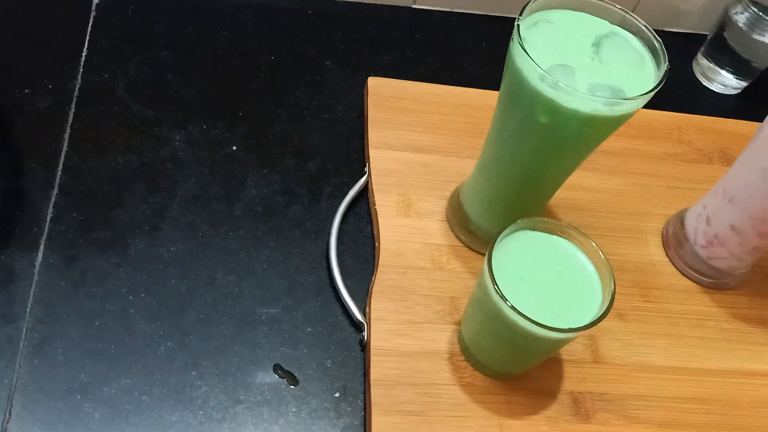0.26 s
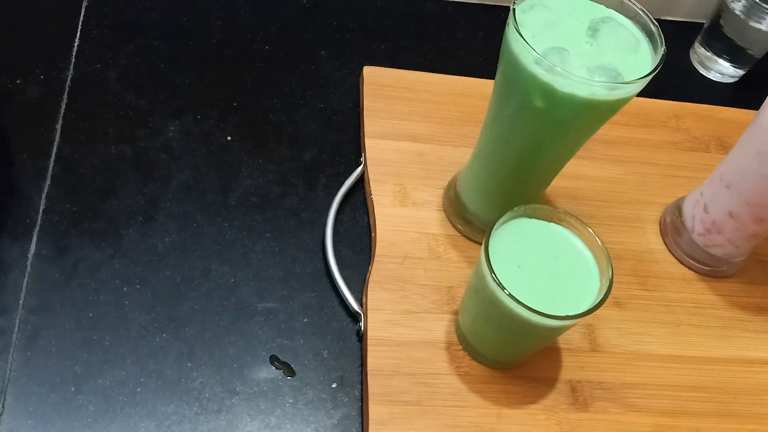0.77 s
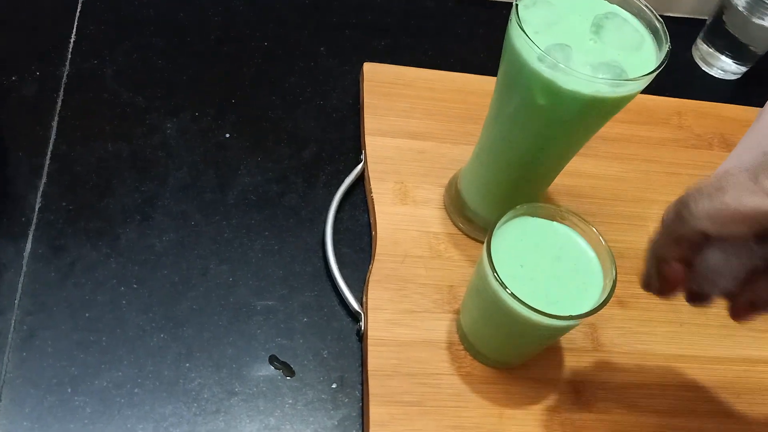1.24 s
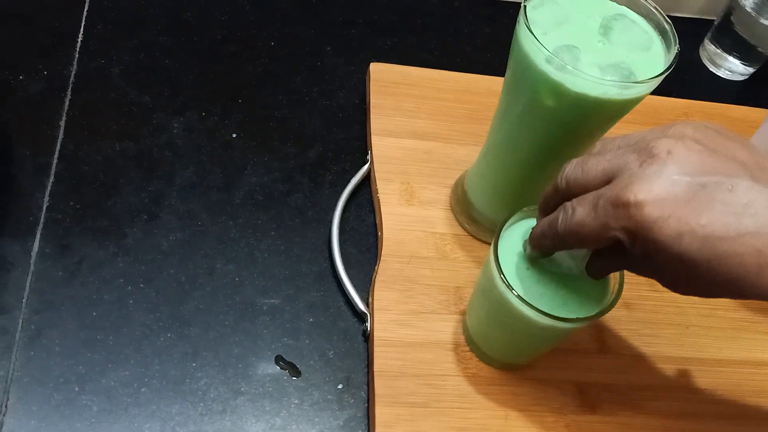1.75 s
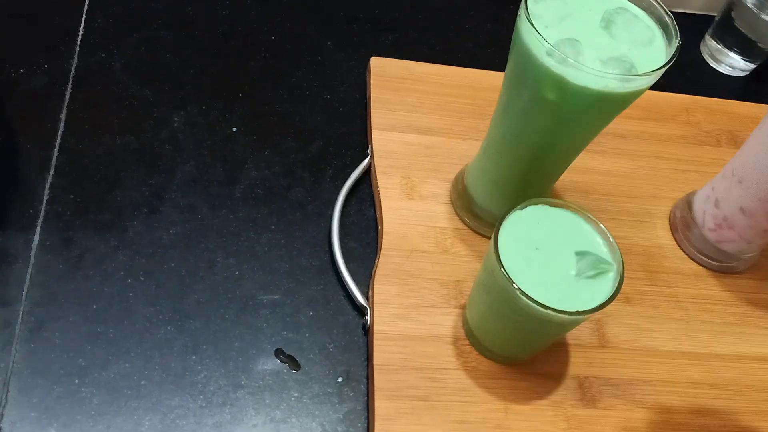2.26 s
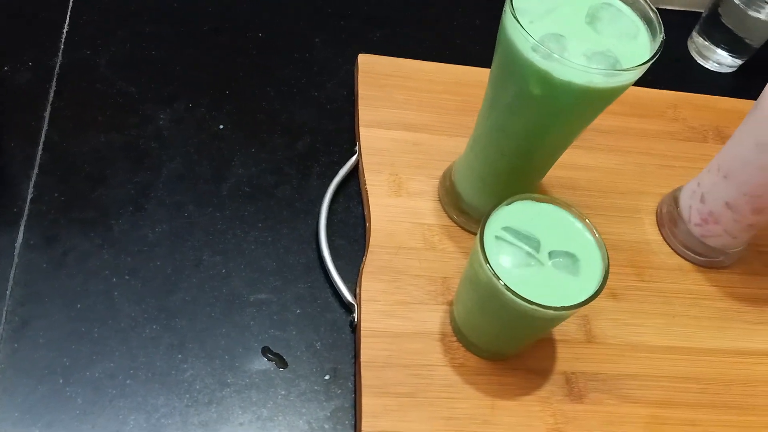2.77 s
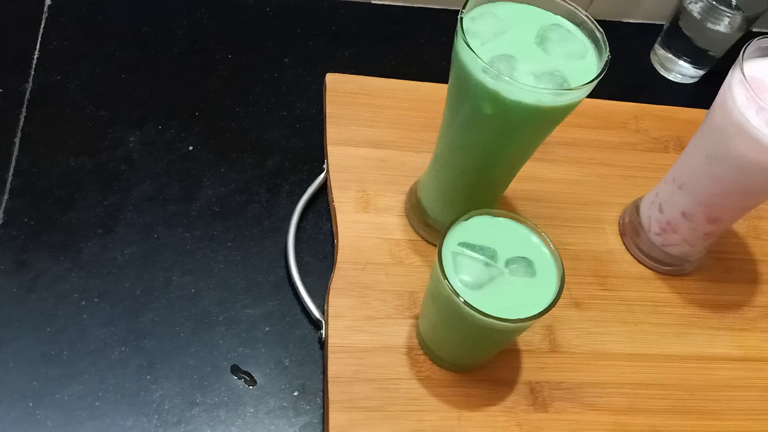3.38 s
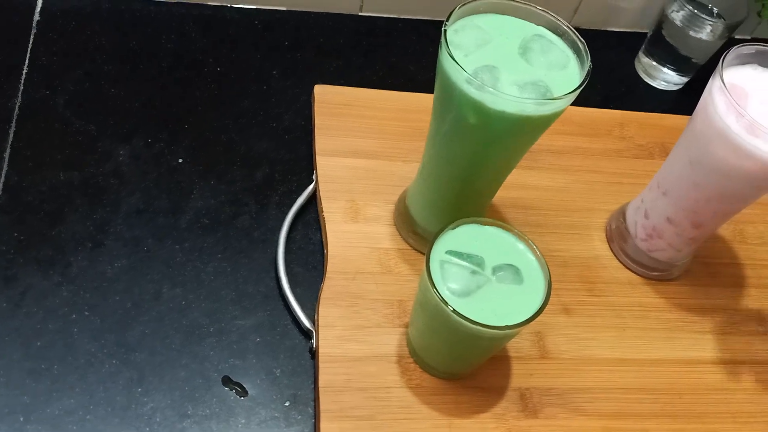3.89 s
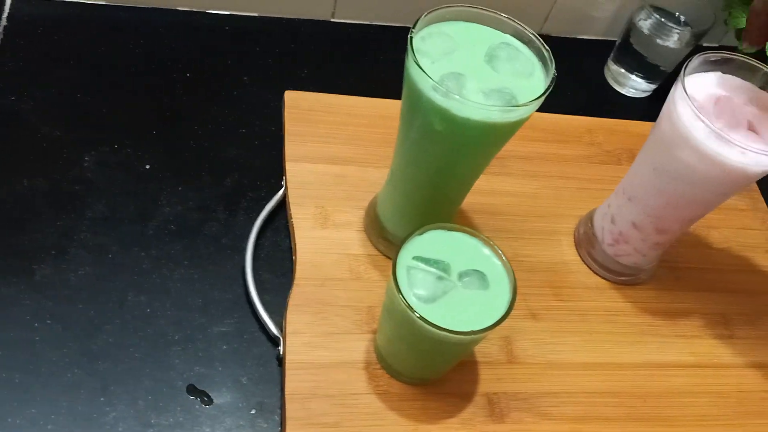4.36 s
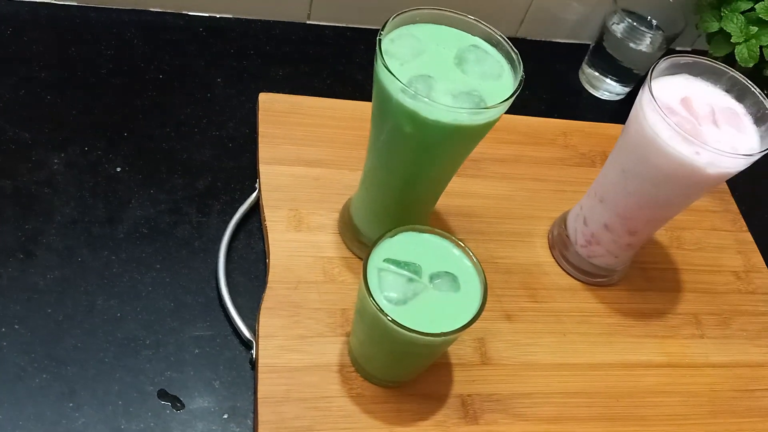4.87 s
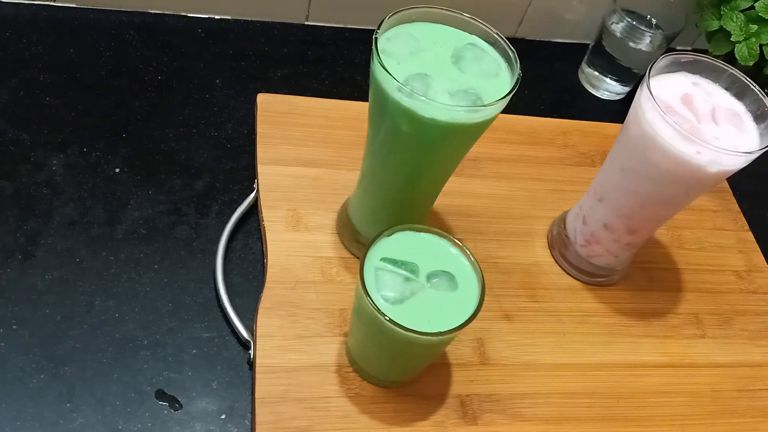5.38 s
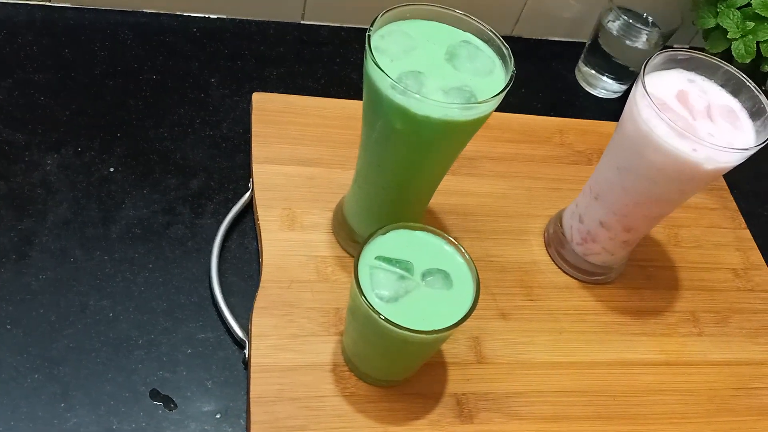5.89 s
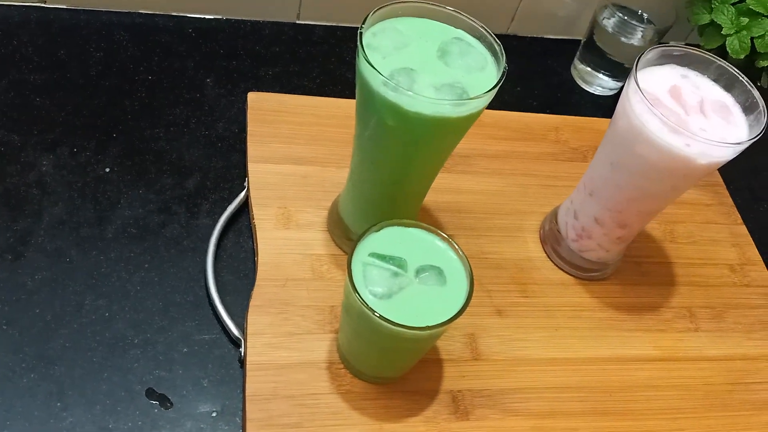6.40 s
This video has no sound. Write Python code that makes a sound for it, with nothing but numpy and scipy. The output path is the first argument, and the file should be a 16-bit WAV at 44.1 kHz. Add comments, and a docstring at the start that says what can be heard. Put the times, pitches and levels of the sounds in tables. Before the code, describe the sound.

Close stereo pickup in a small, reflective kitchen with soft room noise and a faint hum. Ice rattles quickly in a bowl, thins out and ends in a sharp knock. A drinking glass gives a clear, high clink, followed by muted bumps and a few more ice knocks. Tiny bright crackles come later, a thin whine creeps in, and a glass dish clatters hard onto the stone counter.

```python
"""Ice for two milk drinks

Ice is picked out of a bowl and put into two glasses of milk drink on a kitchen board.
Cubes rattle, mostly in the bowl, ring a rim, knock afloat or crackle; near the end a glass dish is set down hard.
Objects are sums of fading tones, and contacts add short bursts of shaped noise.
A tiled kitchen echoes it all with fading noise, over room noise, a fan's hum and a faint, thin whine."""
import sys
import numpy as np
from scipy import signal
from scipy.fft import rfft, irfft
from scipy.io import wavfile
from scipy.ndimage import uniform_filter1d

SR = 44100
rng = np.random.default_rng(int(sys.argv[2]) if len(sys.argv) > 2 else 0)


def wrap_up_sound(samples):
    """Save the sound to the file named by the first command line argument, as 16-bit audio."""
    columns = np.atleast_2d(samples).T
    # keep every value between -1 and 1, then stretch to whole-number steps
    tamed = np.clip(columns, -1, 1)
    steps = np.round(tamed * 32767).astype(np.int16)
    wavfile.write(sys.argv[1], SR, steps)


N = 293176
T = np.arange(N) / SR
RING = 24576  # longest ring of one contact [samples]
RING_T = T[:RING]

# the crack of ice on a hard wall: (frequency [Hz], level [dB])
ICE_CRACK = [(100, -19.5), (800, -15.5), (1400, 0), (2400, 1), (3400, -8), (5800, -8.5), (6800, -23.5),
             (8200, -39.5), (12000, -42), (14500, -44.5)]
# a drinking glass before damping or a rise of the drink: (frequency [Hz], level [dB], time to fade by 60 dB [s])
GLASS_MODES = [(714, -30.5, 0.1), (2125, -23.5, 0.42), (2253, -9.5, 0.82), (2273, 2, 0.56),
               (2360, -11, 0.18), (5633, -25, 0.47), (5683, -22, 0.082), (8549, -53, .3),
               (10220, -58, 0.22), (10900, -46, .2)]
# the dull knock of the dish on the counter, also used for floating cubes: (frequency [Hz], level [dB])
DULL_KNOCK = [(60, -57), (200, -18.5), (400, -21.5), (550, -25.5), (700, -18), (1100, -9.5), (1600, 0.5),
              (2500, -4.5), (3200, -19.5), (3700, -26.5), (5300, -24), (6600, -15.5), (7900, -57),
              (15000, -56)]


def amp(db):
    """Turn decibels into a gain."""
    return 10 ** (np.asarray(db) / 20)


def unit(x):
    """Scale to an energy of one."""
    return x / np.sqrt(np.sum(x ** 2))


def level(x, db):
    """Scale to an average (rms) level."""
    return x * amp(db) / np.std(x)


def along(hz, points):
    """Read between (Hz, value) points on a log-frequency axis."""
    f, v = np.transpose(points)
    return np.interp(np.log(np.maximum(hz, 1)), np.log(f), v)


def colour(x, points):
    """Filter through (Hz, dB) points; the cepstrum gives a filter that never answers before its input."""
    size = 4096
    gains = amp(along(np.fft.rfftfreq(size, 1 / SR), points))
    cepstrum = irfft(np.log(gains))
    # fold the second half onto the first, so that nothing comes early
    cepstrum[1:size // 2] *= 2
    cepstrum[size // 2 + 1:] = 0
    response = irfft(np.exp(rfft(cepstrum)))
    return signal.fftconvolve(x, response)[:len(x)]


def walk(rate):
    """Wander smoothly at random, with a spread of one and about this many new steps per second."""
    k = int(SR / rate)
    steps = np.repeat(rng.standard_normal(N // k + 1), k)
    smooth = uniform_filter1d(uniform_filter1d(steps, k), k)
    return level(smooth[:N], 0)


def narrow(hz, width_hz):
    """Make a tone whose size and phase wander, which spreads it over a narrow band."""
    phase = 2 * np.pi * np.cumsum(hz * np.ones(N)) / SR
    tone = walk(2 * width_hz) * np.sin(phase) + walk(2 * width_hz) * np.cos(phase)
    return level(tone, 0)


def fade(t60):
    """Die away exponentially, by 60 dB in t60 seconds."""
    return np.exp(-np.log(1000) * RING_T / t60)


def gate(start, end, attack_s, release_s):
    """Rise from start, hold until end, then fall."""
    rise = np.clip((T - start) / attack_s, 0, 1)
    return rise * np.clip(1 - (T - end) / release_s, 0, 1)


def ring(modes, damping=1):
    """An object's answer to one tap: fading sines of alternating sign, shortened by damping."""
    total = np.zeros(RING)
    for k, (hz, db, t60) in enumerate(modes):
        sine = fade(t60 / damping) * np.sin(2 * np.pi * hz * RING_T)
        total += (-1) ** k * amp(db) * unit(sine)
    return unit(total)


def struck(modes):
    """Vary the modes for one contact: each a little stronger or weaker, by where it lands."""
    scatter_db = 2
    luck = rng.standard_normal(len(modes))
    return [(hz, db + scatter_db * chance, t60) for (hz, db, t60), chance in zip(modes, luck)]


def crack(points, t60):
    """The brief noisy crunch of a contact: fading noise, coloured."""
    return unit(colour(rng.standard_normal(RING) * fade(t60), points))


def contact(body, treble_db, low_db=0):
    """A harder contact brings out the treble, a heavier one the low modes."""
    return colour(body, [(800, 0), (1400, low_db), (1700, low_db), (2250, 0), (2900, 0), (4200, treble_db)])


def strike(hits, bodies, pan_db):
    """Play one body per hit, at its time and level, all from one place; pan_db is left minus right."""
    out = np.zeros(N + RING)
    for (s, db, *_), body in zip(hits, bodies):
        out[int(s * SR):][:RING] += amp(db) * body / np.abs(body).max()
    return amp([[pan_db / 2], [-pan_db / 2]]) * out[:N]


def room_air():
    """Room noise: a shared part and a left-right difference that is weak in the bass, both wavering."""
    # (frequency [Hz], level [dB])
    air_colour = [(25, -42.5), (60, -20), (125, -5), (170, -10.5), (300, -14), (500, -16.5), (900, -23.5),
                  (1400, -29), (2200, -21.5), (3300, -35), (4500, -37.5), (6000, -34.5), (7800, -54.5),
                  (15000, -60.5)]
    air_db, waver_db, wavers_per_s = -66.5, 1, 4
    mid = colour(rng.standard_normal(N), air_colour)
    side = colour(rng.standard_normal(N), air_colour)
    side = colour(side, [(120, -18.0), (300, -10.5), (600, -6.5), (1200, 0.0)])
    pair = np.array([mid + side, mid - side])
    return amp(air_db) / np.std(mid) * pair * amp(waver_db * walk(wavers_per_s))


def fan():
    """The fan's hum: low tones whose size and phase waver."""
    # (frequency [Hz], width [Hz], level [dB])
    hums = [(118, 32, -85), (126, 33, -76.5)]
    return sum(amp(db) * narrow(hz, width) for hz, width, db in hums)


def whine():
    """A thin whine, as of a water pipe: a drifting tone that wavers separately left and right."""
    # how it comes and goes: (time [s], level [dB])
    loudness = [(4.1, -110), (4.38, -79), (4.72, -72), (5.0, -73.5), (5.2, -76), (5.5, -75), (6.52, -75.5),
                (6.65, -90)]
    centre_hz, width_hz, drift_hz = 3368, 56, 5
    pitch = centre_hz + drift_hz * walk(5.3)
    swell = amp(np.interp(T, *np.transpose(loudness)))
    return swell * np.array([narrow(pitch, width_hz) for _ in range(2)])


def kitchen(sound, build_s=0.00021):
    """Spread echoes made of noise, unrelated left and right; the treble dies first."""
    # how long echoes last: (frequency [Hz], time to fade by 60 dB [s])
    echo_times = [(200, 0.96), (1000, 0.6), (2500, 0.54), (5000, 0.55), (12000, 0.34)]
    hz = np.fft.rfftfreq(RING, 1 / SR)
    edges = np.append(0, np.geomspace(300, SR / 2, num=9))
    noise = rfft(rng.standard_normal((2, RING)))
    tails = np.zeros((2, RING))
    for lo, hi in zip(edges, edges[1:]):
        band = irfft(noise * (hz >= lo) * (hz < hi))
        tails += band * fade(along((lo + hi) / 2, echo_times))
    tails = tails * (1 - np.exp(-(RING_T / build_s) ** 2))
    mono = sound.mean(axis=0)
    return np.array([signal.fftconvolve(mono, unit(tail))[:N] for tail in tails])


def board():
    """Soft contacts push slowly, so the wooden board thumps without a click."""
    # dull, soft knocks: (time [s], level [dB], treble [dB])
    thumps = [(2.696, -47.5, 19), (2.83, -58, 8), (5.059, -54.5, -12), (6.561, -54, 17)]
    # the wood: (frequency [Hz], level [dB])
    wood = [(25, -38), (60, -15), (130, 3.5), (220, -10), (380, -1.5), (520, -1), (850, -8.5), (1250, -4),
            (1700, -10), (2300, 4), (3500, -23), (9000, -63)]
    push = 1 - fade(0.13)
    knocks = [contact(push * crack(wood, t60=0.13), treble_db) for *_, treble_db in thumps]
    return strike(thumps, knocks, pan_db=-0.5)


def floating():
    """Cubes afloat nudge the wall of the glass; the drink chokes the ring."""
    # (time [s], level [dB])
    bumps = [(2.771, -49), (2.815, -45.5), (2.829, -52)]
    wall = ring(GLASS_MODES, damping=29)
    knocks = [wall + amp(-13) * crack(DULL_KNOCK, t60=0.01) for _ in bumps]
    return strike(bumps, knocks, pan_db=9)


def bright_snaps():
    """Quick bright snaps at the glass: the click of a second rim tap, then ice crackling as it gets wet."""
    # the click, then the crackles: (time [s], level [dB])
    snap_times = [(2.0812, -53), (4.4053, -44), (4.414, -41.5), (4.4225, -51), (4.4292, -43.5),
                  (4.432, -44.5), (4.4375, -41.5), (4.4395, -39), (4.781, -49.5)]
    # one snap: (frequency [Hz], level [dB])
    snap_colour = [(200, -18), (900, -10), (1700, -1.5), (2300, 4.5), (3200, -9.5), (4200, -5.5), (5200, 0),
                   (6800, -8.5), (8000, -22.5), (12000, -28), (14500, -27)]
    wall = amp(-3.0) * ring(GLASS_MODES, damping=2.7)
    return strike(snap_times, [wall + crack(snap_colour, t60=0.015) for _ in snap_times], pan_db=4.5)


def dish(ring_db=-23.0, ring_pan_db=5):
    """The heavy dish clatters on the stone counter; its clear ring builds up as it rocks flat."""
    # landing and rocking flat: (time [s], level [dB])
    landing = [(5.5773, -21), (5.5821, -33), (5.587, -29.5), (5.597, -29.5), (5.6015, -32), (5.656, -36.5)]
    # the dish before damping: (frequency [Hz], level [dB], time to fade by 60 dB [s])
    dish_modes = [(430, -21.5, 1), (696, -16, 0.17), (890, -20, 0.4), (1063, -16.5, 0.38),
                  (1160, -13.5, 0.12), (1397, -6.5, 0.5), (1507, -1.5, 0.31), (1614, -1.5, 0.24),
                  (1673, -12, 0.17), (1825, -1, 0.16), (1924, -5.5, .18), (2024, -3, 0.24), (2094, -4, 0.5),
                  (2194, -7.5, .25), (2490, 3.5, 0.3), (2746, -3, 0.75), (2835, -22.5, 0.11),
                  (2920, -16.5, 0.18), (4125, -9.5, 0.3), (4206, -12, 0.27), (4710, -15.5, 0.45),
                  (4780, -20.5, 0.33), (5023, -24, 0.3), (6280, -27, 0.4), (6160, -14, 0.26),
                  (6780, -17.5, .42), (6890, -19.5, 0.42), (7120, -27, 0.35), (8624, -51, .5),
                  (9593, -29.5, 0.5), (10300, -28.5, .35), (11250, -45, 0.24), (12540, -33.5, .22),
                  (13300, -37, .2), (14500, -33, 0.33)]
    # it lands dull on its base, then tips onto its harder edge
    flat_treble_db, edge_treble_db, tip_s = -14, 7, 0.0076
    lands_s = landing[0][0]
    clatter = []
    for s, _ in landing:
        flatness = np.exp((lands_s - s) / tip_s)
        treble_db = edge_treble_db + (flat_treble_db - edge_treble_db) * flatness
        knock = amp(-6) * crack(DULL_KNOCK, t60=0.0095)
        body = amp(-4) * ring(struck(dish_modes), damping=4.1)
        clatter.append(contact(knock + body, treble_db))
    thuds = strike(landing, clatter, pan_db=9.5)
    tone = ring(dish_modes) * (1 - fade(0.021))
    return thuds, strike([(lands_s, ring_db)], [tone], ring_pan_db)


def rim():
    """A cube taps the free rim, whose close main notes beat softly; one rubs the wall as it floats up."""
    # a cube striking the rim: (time [s], level [dB], treble [dB], damping [times])
    rim_hits = [(2.007, -27, -10, 1.11), (2.082, -44, 20.5, 0.88), (2.3415, -53, 10.5, 1.3),
                (4.43, -56, 0, 0.79), (4.88, -61, -10, 2.5)]
    # once the cube is in, the drink stands higher and the glass's notes drop to this share
    sunk_s, sunk_share = 2.3, 0.98
    taps = []
    for s, _, treble_db, damping in rim_hits:
        share = sunk_share if s > sunk_s else 1
        modes = [(hz * share, db, t60) for hz, db, t60 in GLASS_MODES]
        tone = ring(modes, damping) * (1 - fade(0.013))
        taps.append(contact(tone + amp(-22.5) * crack(ICE_CRACK, t60=0.013), treble_db))
    # a cube rubbing along the wall makes the fuller glass sing for a moment
    rub_hz, rub_db, waver_db = 2200, -64, 7
    pressure = amp(rub_db + waver_db * walk(24.6))
    touch = gate(start=2.58, end=2.655, attack_s=0.048, release_s=0.08)
    rub = pressure * touch * level(np.sin(2 * np.pi * rub_hz * T), 0)
    return strike(rim_hits, taps, pan_db=5.5) + rub


CUBE_HZ, CUBE_T60_S = 1983, 0.046  # a middling cube: its note and its ring time


def cube(hz, t60):
    """A lump of ice rings on its own note; the freer it lies, the longer it rings and the more it gives."""
    # a lump of ice: (multiple of its pitch [times], level [dB])
    lump = [(1, 5.5), (1.94, -14), (2.55, -14.5), (3.28, -20), (3.87, -21)]
    # blunt contacts hardly drive its highest modes: (frequency [Hz], level [dB])
    blunt = [(5800, -5), (6800, -14), (8000, -31.5)]
    tone = ring([(hz * ratio, db, t60) for ratio, db in lump])
    return amp(5) * np.sqrt(t60 / CUBE_T60_S) * unit(colour(tone, blunt))


def slide(duration_s, db, rate):
    """A run of random tiny slips that dies away as the heap settles."""
    settle_s = 0.024  # time constant in which the heap comes to rest
    t = T[:SR]
    slips = level(rng.laplace(size=SR) * (rng.random(SR) < rate / SR), db)
    return slips * np.exp(-np.maximum(t - duration_s, 0) / settle_s)


def rattling_cubes(count=4):
    """Cubes knock, mostly as fingers stir the bowl, two in the glass near 2.7-2.8 s; runs of tiny slips."""
    # cubes knocking: (time [s], level [dB], treble [dB], cube's pitch [Hz], its time to fade by 60 dB [s])
    knock_list = [(.168, -44, -4, 1690, 0.0089), (.242, -31, -5, 2240, 0.0026),
                  (0.248, -26, 3, 2090, 0.0049), (0.2568, -27.5, 2, 2300, 0.011),
                  (0.2786, -31.5, -9, 2710, 0.021), (0.283, -30.5, 2, 2970, 0.0099),
                  (0.2948, -27.5, -4, 1620, 0.0065), (0.3425, -35, 9, 2880, 0.0084),
                  (0.3462, -28.5, -6, 2240, 0.0026), (.349, -31.5, 1, 1590, 0.0048),
                  (0.3636, -32.5, 2, 2530, .008), (.395, -22.5, -15, 2380, 0.027),
                  (0.3989, -30.5, -1, 2600, .012), (.411, -30, 0, 2726, 0.038),
                  (.445, -33, -2, 2585, 0.055), (0.4902, -38, -3, 2330, 0.053),
                  (0.563, -49, -5, 1524, 0.04), (0.685, -51, -21, 1620, 0.037),
                  (0.7015, -36.5, 0.5, 2345, 0.058), (0.7463, -37.5, 0, 2286, 0.035),
                  (.759, -36.5, 0, 2304, 0.059), (0.8857, -44, 3, 1614, 0.033),
                  (0.9274, -43.5, 2, 1490, .015), (0.9414, -41.5, -7, 1580, 0.018),
                  (0.949, -45, 0, 1668, 0.059), (1.0248, -48, -10, 1676, 0.033),
                  (1.0794, -37.5, -8, 1545, 0.039), (1.1393, -21, -13.5, 2286, 0.029),
                  (1.1401, -27, 5, 1452, 0.044), (2.708, -42.5, -5, 1310, 0.029),
                  (2.8158, -49.5, -5, 2410, 0.077), (2.9654, -44, 0, 1880, 0.0062),
                  (2.990, -32.5, -4.5, 2157, 0.012), (3.001, -53, 10, 2300, .006),
                  (3.037, -49.5, -11, 2150, 0.025), (3.1412, -35, 0, 1737, 0.049),
                  (3.199, -43, -6, 1740, 0.065), (3.3523, -52.5, 7, 2670, 0.015),
                  (3.57, -53.5, -9.5, 4500, 0.032), (3.5948, -49.5, 4, 5400, 0.0047)]
    # cubes sliding over each other, all cubes together:
    # (start [s], end [s], level [dB], treble [dB], middle pitch [Hz], slips [per s])
    slides = [(0.169, 0.246, -62.5, -1.5, 1980, 780), (0.249, 0.287, -42.5, 1.5, 2414, 410),
              (.335, 0.376, -45, 0, 2288, 550), (0.5, 1.123, -64.5, -0.5, 1600, 166),
              (0.701, 0.791, -56.5, 0.5, 2540, 870), (2.984, 3.028, -61, -1.5, 2115, 420),
              (3.141, 3.178, -55, -4, 2520, 1370)]
    # the bowl with its ice, before scatter: (frequency [Hz], level [dB], time to fade by 60 dB [s])
    bowl_modes = [(1456, -5, 0.018), (1602, 1, 0.017), (2170, -9.5, 0.01), (2268, -5, 0.035),
                  (2400, -7.5, 0.012), (2840, -9, 0.016), (3750, -13.5, 0.028), (4130, -14, 0.0057),
                  (4900, -18, 0.024), (5230, -19.5, .006), (5580, -17, 0.023), (11400, -45.5, 0.008)]
    scatter_octaves = 0.12  # no two slides meet on the same cube

    def weight_db(hz):
        """Bigger, lower cubes drive the low modes harder, by 16.5 dB per octave."""
        return 16.5 * np.log2(CUBE_HZ / hz)

    knocks = []
    for _, _, treble_db, hz, t60 in knock_list:
        # a wedged cube crunches; the longer one rings, the less crunch it has
        crunch_db = -9 - 6 * np.log2(t60 / 0.0067)
        body = ring(struck(bowl_modes)) + amp(crunch_db) * crack(ICE_CRACK, t60=0.025)
        knocks.append(contact(body + cube(hz, t60), treble_db, weight_db(hz)))
    scrape = np.zeros(N)
    for start, end, db, treble_db, hz, rate in slides:
        for note in hz * 2 ** (scatter_octaves * rng.uniform(-1, 1, count)):
            body = ring(struck(bowl_modes)) + amp(4.5) * crack(ICE_CRACK, t60=0.0042)
            body = body + amp(-0.5) * cube(note, CUBE_T60_S)
            slips = slide(end - start, db, rate / count)
            run = signal.fftconvolve(slips, unit(contact(body, treble_db, weight_db(hz))))
            scrape[int(start * SR):][:len(run)] += run / np.sqrt(count)
    direct = strike(knock_list, knocks, pan_db=6) + scrape
    # such small things radiate little bass
    return signal.sosfilt(signal.butter(1, 900, "high", fs=SR, output="sos"), direct)


def lagged(pair, lag_ms):
    """The direct sound reaches the left microphone a little later."""
    return np.array([np.roll(pair[0], int(lag_ms * SR / 1000)), pair[1]])


def scene():
    """Mix direct sound, echoes and background; the rim's ring echoes least, the bright snaps most."""
    singing, bumps, rattle, snaps = rim(), floating() + board(), rattling_cubes(), bright_snaps()
    landing, ringing = dish()
    to_room = amp(-12) * singing + amp(-4.5) * bumps + amp(-2.0) * rattle
    to_room = to_room + amp(5.0) * snaps + amp(1.0) * landing + amp(-5) * ringing
    echoes = kitchen(to_room)
    direct = lagged(singing + bumps + rattle, lag_ms=.15) + lagged(landing + ringing, lag_ms=0.25) + snaps
    return direct + echoes + room_air() + fan() + whine()


def record(dry):
    """The two microphones colour the sound differently; the top is cut above 15150 Hz."""
    left = colour(dry[0], [(400, -1.0), (1600, 0.5), (3200, 7.0), (4700, 9.5),
                           (6500, 4.5), (9000, 5.0), (14000, 9.5)])
    right = colour(dry[1], [(400, 0.0), (1600, 3.5), (3200, 5.5), (4700, 4.0),
                            (6500, 4.0), (9000, 5), (14000, 12.0)])
    top_cut = signal.ellip(8, .2, 70, 15150, fs=SR, output="sos")
    return signal.sosfilt(top_cut, [left, right])


dry = scene()
out = record(dry)
wrap_up_sound(out)
```